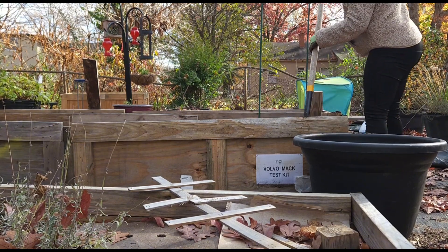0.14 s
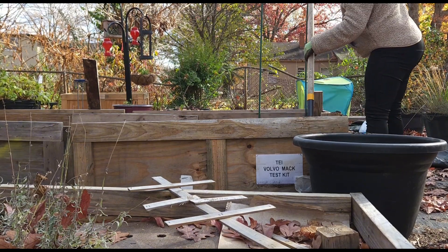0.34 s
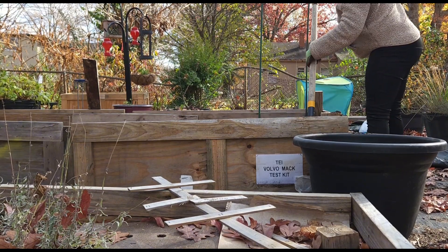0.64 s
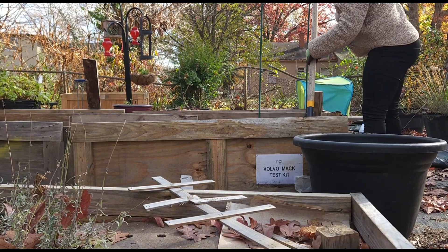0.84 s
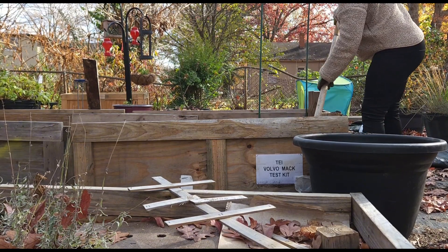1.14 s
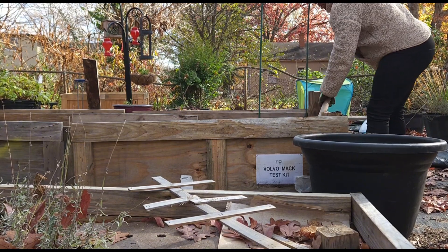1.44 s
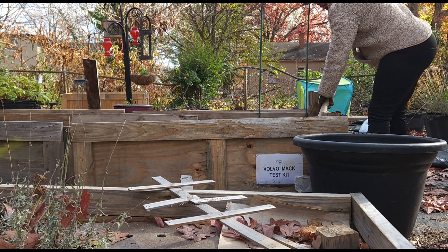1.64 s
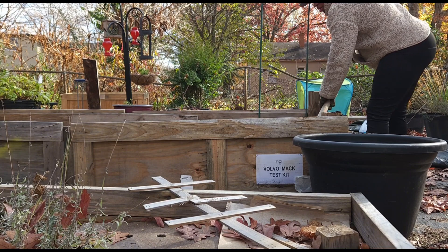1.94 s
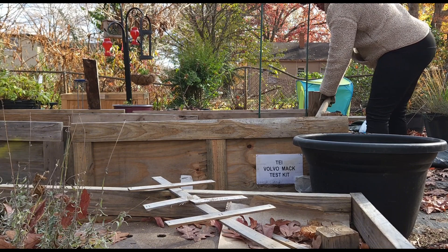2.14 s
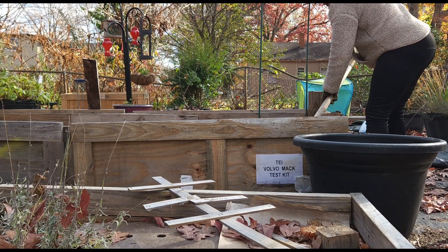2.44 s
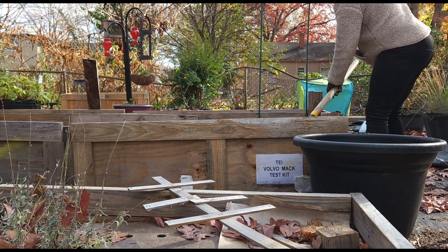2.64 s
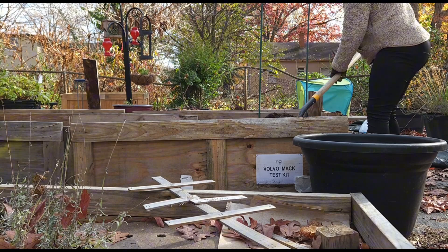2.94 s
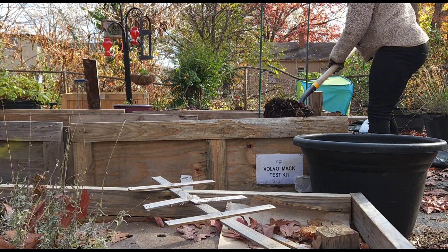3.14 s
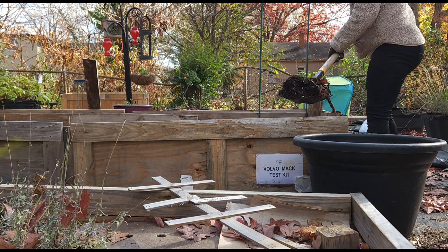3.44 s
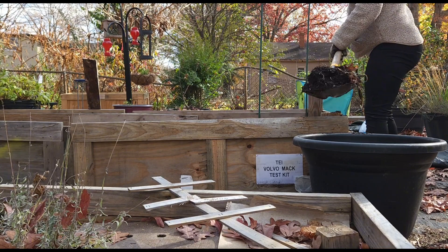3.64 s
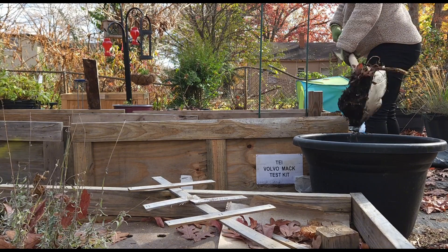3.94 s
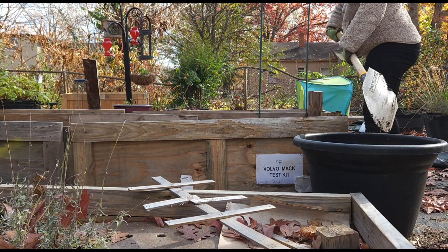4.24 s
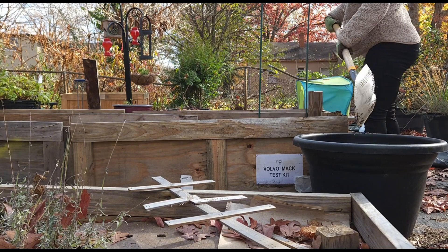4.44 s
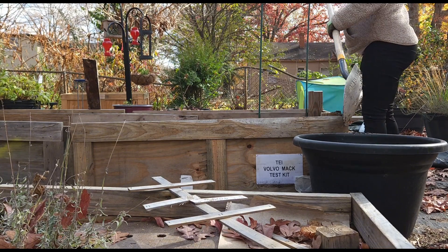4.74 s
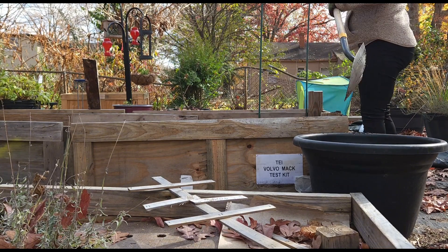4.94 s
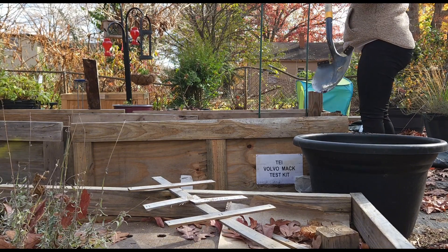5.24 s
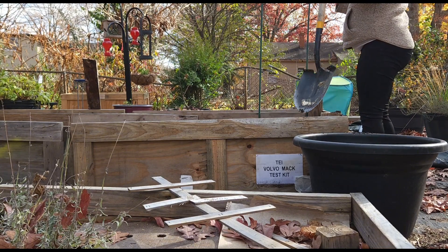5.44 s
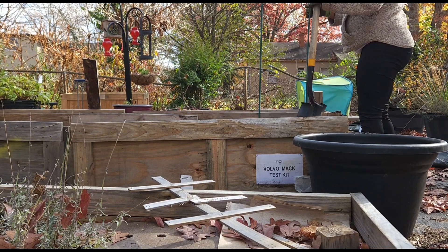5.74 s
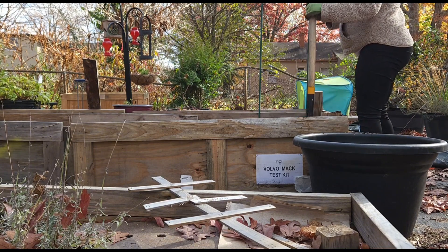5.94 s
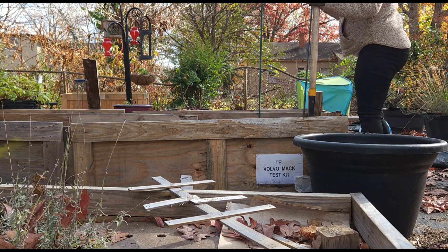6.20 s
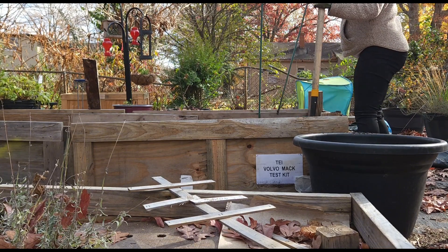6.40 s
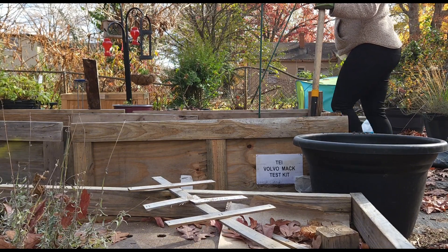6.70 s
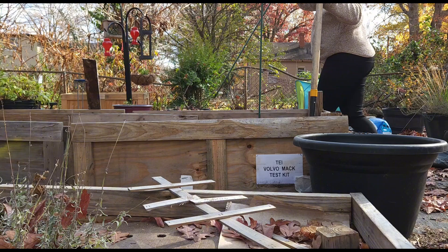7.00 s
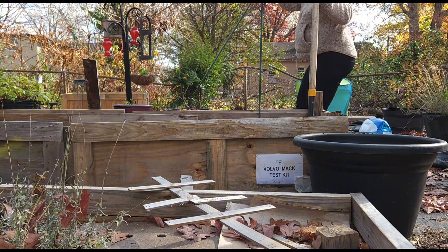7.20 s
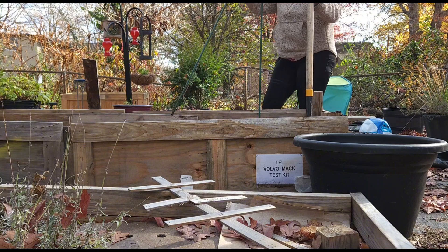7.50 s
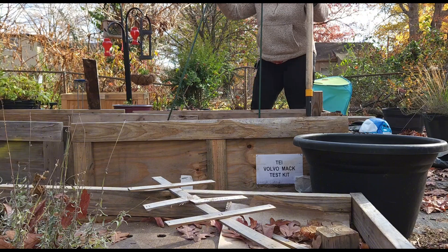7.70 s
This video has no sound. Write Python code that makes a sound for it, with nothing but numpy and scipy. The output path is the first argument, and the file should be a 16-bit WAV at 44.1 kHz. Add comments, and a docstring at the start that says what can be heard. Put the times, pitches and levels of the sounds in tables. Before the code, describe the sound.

A shovel knocks against a wooden garden bed, tips soil into a plastic pot and taps its rim, over a low outdoor rumble.

```python
"""A shovel knocks against the planks of a raised bed; clods break and grit rubs along the steel.
The hardest blow comes at 2 s. Just after 4 s soil slides off the blade into a big plastic pot,
and two taps on the rim set blade and pot ringing. After a few faint knocks and scrapes, feet
shuffle off through dry leaves and cracking twigs from 6.5 s.
Throughout: a distant engine's hum, low rumble and the hiss of the open yard."""
import sys
import numpy as np
from scipy import signal
from scipy.fft import rfft, irfft
from scipy.io import wavfile

SR = 44100
rng = np.random.default_rng(int(sys.argv[2]) if len(sys.argv) > 2 else 0)


def wav_record(signal):
    """Record a signal, one row per channel, as 16-bit PCM in the file named by sys.argv[1]."""
    frames = np.transpose(np.atleast_2d(signal))
    bounded = np.clip(frames, -1, 1)
    # unit amplitude maps onto the largest positive 16-bit level
    quanta = np.round(bounded * 32767).astype(np.int16)
    wavfile.write(sys.argv[1], SR, quanta)


N = 346626
TIME_S = np.arange(N) / SR
HIT_TIME_S = np.arange(SR // 2) / SR

# blows on the planks: start_s, gain_db, lowpass_hz, decay_rate_factor
KNOCKS = [(0.038, -46, 1800, 0.68), (.267, -28.5, 1080, 0.88), (0.3638, -32, 560, 1.1),
          (.417, -44, 1200, 1), (0.4418, -49.5, 900, 0.58), (.468, -48.5, 595, 0.53),
          (0.6319, -52, 1100, 0.53), (0.7582, -51.5, 1500, 0.51), (1.9852, -14.5, 660, 2.5),
          (2.279, -37.5, 400, 1.4), (5.896, -52, 1200, 0.81), (6.174, -55, 700, 1.1)]
# low thumps on the boards and the pot: start_s, level_db, end_pitch_hz, extra_start_pitch_hz, length_s
THUDS = [(0.329, -24.5, 55.7, 5, 0.056), (1.983, -7.5, 103, 336, 0.02), (2.2774, -19, 104.5, 10, 0.02),
         (4.227, -30, 89.5, 10, .03), (4.619, -23, 82, 69, .024), (7.822, -31, 135, 20, 0.016)]
# blade on the rim: start_s, ring_db, clash_db, pot_db, clash_highpass_hz, centre_hz, reach_oct
TAPS = [(4.6107, -37.5, -27, -25, 400, 2400, 8.6), (4.8182, -35.5, -33.5, -43, 1620, 2050, 0.12)]
# blade strokes through soil: start_s, length_s, level_db
CUTS = [(0.908, 0.063, -56.5), (1.215, 0.08, -63), (2.17, 0.225, -48.5), (5.838, 0.02, -58),
        (5.918, 0.081, -58.5)]
# clods breaking on the boards: start_s, level_db
CLOD_BREAKS = [(0.255, -47), (0.35, -48), (0.425, -47.5), (0.615, -49.5), (0.74, -59), (0.85, -56.5)]
# stones flicking the steel: start_s, gain_db, highpass_hz
STONE_TICKS = [(0.927, -41, 3000), (.957, -44, 1500), (1.985, -39.5, 1500), (4.1787, -27, 11000),
               (4.2334, -31, 11000), (4.8192, -47, 9000)]
# lumps dropping into the pot: start_s, level_db
LUMPS = [(4.209, -47), (4.231, -45.5), (4.282, -50), (4.322, -49), (4.375, -50)]
# steps in leaves: start_s, length_s, rustle_db, tread_db
STEPS = [(6.524, 0.26, -55.5, -63), (6.81, 0.17, -58, -63), (7.02, 0.27, -58, -66), (7.275, 0.24, -50, -51),
         (7.577, 0.12, -56, -70), (7.795, 0.018, -63, -52.5)]
# twigs cracking: start_s, ring_db, pitch_hz, snap_db
TWIG_CRACKS = [(5.896, -51, 1610, -64), (6.142, -53.5, 1460, -64), (7.296, -52, 990, -44),
               (7.352, -52, 950, -56), (7.395, -52, 1015, -44), (7.418, -64, 1100, -57),
               (7.452, -58, 1050, -51), (7.466, -55, 1090, -41), (7.492, -45.5, 970, -40),
               (7.515, -65, 1050, -38.5), (7.6576, -64, 1090, -61), (7.806, -44, 1005, -62)]

# modes: pitch_hz, gain_db, base_t60_s
PLANK_MODES = [(173, 2.5, 0.046), (240.6, 2.5, 0.12), (340.4, 3, 0.09), (425, -5, 0.049),
               (475, -2.5, 0.064), (653, -2, 0.079), (878, 0.5, 0.021), (987, -7.5, 0.061),
               (1185, -10.5, 0.05), (1690, -13, 0.031), (2010, -9.5, 0.063)]
BLADE_MODES = [(585, -11, 0.52), (808, -0.5, 0.54), (1168, -19, 0.37), (1376, -6, 0.25), (1443, -11, 0.34),
               (1577, -11, 0.45), (1706, -15, 0.45), (1838, -16, 0.45), (1927, -12, 0.26),
               (2016, -10, 0.52), (2060, -11, 0.35), (2432, -8, 0.4), (2511, -2, 0.34), (2772, -15, 0.28),
               (3865, -20, 0.52), (4624, -21, 0.52), (5644, -28, 0.52), (7086, -15, 0.28),
               (7355, -12, 0.24), (9000, -29, 0.3), (10420, -23, 0.45), (13140, -29, 0.26)]
CHOKED_MODES = [(1410, 2, 0.034), (1606, 2, 0.043), (1730, -7, 0.026), (2420, -2.5, 0.037), (7250, -6, .04)]  # blade pressed on the rim
POT_MODES = [(130.6, 3.5, 0.14), (162, 0, 0.099), (214, -2, 0.075), (249, -2.5, 0.081), (344, -2, 0.08),
             (413, -3.5, 0.078), (575, -5, 0.074)]
# twig modes: pitch_ratio, gain_db, t60_s
TWIG_MODES = [(1, 2.5, 0.063), (1.35, -7.5, 0.048), (2.15, -7, 0.047), (2.74, -4.5, .04), (4.25, -7, 0.037)]

# noise spectra: freq_hz, relative_density_db
CRUNCH_SPECTRUM = [(150, 8), (350, 8.5), (900, 2), (1500, 14), (2200, -13), (3200, 3), (8000, -5),
                   (16000, -30)]  # soil crushed by a knock
CLOD_SPECTRUM = [(230, 2.5), (350, 10), (480, 2), (750, -2), (1100, -24), (1600, -15.5), (2400, -38),
                 (4000, -40)]
CLASH_SPECTRUM = [(200, 6.5), (600, -7), (1000, -12), (1500, 1), (2600, -6), (3300, -16), (5500, -13),
                  (7300, -4), (8500, -15), (13000, -24), (16000, -26)]  # steel on the rim
SHIMMER_SPECTRUM = [(500, 4), (800, 3), (1200, -7), (1900, 0), (2600, -7), (3300, -10), (7300, -7),
                    (9000, -14), (10400, -22), (12000, -19), (16000, -26)]  # faint, crowded blade modes
GRIT_SPECTRUM = [(300, 5), (800, 3), (1800, -1.5), (3000, -0.5), (4800, 2.5), (5700, 1.5), (6400, 6),
                 (7400, -1), (9000, -3.5), (12000, -11), (16000, -13)]
STONE_SPECTRUM = [(1500, -5), (2100, 10), (3200, 1.5), (6000, -3), (7400, 8.5), (9000, -5), (12000, -13),
                  (14000, -10), (16000, -23)]
SLIDE_SPECTRUM = [(2000, -2), (6000, 3), (9000, -8), (11000, -5), (13000, 4), (16000, -11)]  # soil leaving the blade
LANDING_SPECTRUM = [(150, -7), (350, -10), (620, -2), (900, -5), (1300, -6), (1800, -13), (4000, -29)]  # soil landing in the pot
LEAF_SPECTRUM = [(1000, 1), (2200, 3), (3200, -1.5), (4600, 4.5), (6200, 1.5), (7400, 4), (9000, -9),
                 (12000, -10), (16000, -15)]
TREAD_SPECTRUM = [(200, 2), (400, 10), (750, -1.5), (1050, -1), (1700, -15), (3500, -29)]  # sole on the ground
RUMBLE_SPECTRUM = [(16, -25), (32, -5), (50, -1), (70, 0), (90, -1.5), (125, -3.5), (160, -9.5),
                   (205, -18.5), (250, -30), (320, -32), (420, -58), (900, -82)]
HISS_SPECTRUM = [(150, -28), (250, -6), (298, -7.5), (380, -1), (429, -8), (686, -7), (955, -14.5),
                 (2160, -13), (2810, -17.5), (4260, -16.5), (5830, -21), (7440, -19), (9010, -31.5),
                 (15200, -40), (16000, -37)]

# engine's firing line: time_s, level_db
FIRING_LEVEL = [(0, -45), (0.45, -37.5), (1.4, -56), (2.7, -48.5), (3.35, -40.5), (5.6, -38), (6.6, -46),
                (7.86, -53)]
# engine's lesser lines: pitch_hz, level_db
ENGINE_LINES = [(72, -48.5), (80, -51), (132, -55), (184, -61)]
# yard's stereo width: freq_hz, correlation
YARD_CORRELATION = [(60, 1), (130, 0.98), (290, 0.95), (640, 0.12), (1410, -0.28), (3100, 0.024),
                    (6820, -0.019), (15000, -0.0014)]
# yard's balance: freq_hz, left_minus_right_db
YARD_BALANCE = [(60, 1), (110, -1), (200, 2.5), (380, -0.5), (700, 1.5), (1290, 2.0), (2380, 3),
                (4400, 0.0), (8120, -0.5), (15000, 7.5)]


def plank_knocks(crunch_db=-7, crunch_t60_s=0.11, settle_db=-13, settle_t60_s=0.23):
    """Blows ring damp planks and loosen soil; each has its own dullness and damping."""
    out = np.zeros((2, N))
    for start_s, gain_db, lowpass_hz, damping in KNOCKS:
        ring = ringing([(hz, db, t60_s / damping) for hz, db, t60_s in PLANK_MODES])
        crunch = amp(crunch_db) * burst(CRUNCH_SPECTRUM, crunch_t60_s / damping, corr=0.64)
        settling = amp(settle_db) * burst(CLOD_SPECTRUM, settle_t60_s / damping, corr=0.94)
        lowpass = signal.butter(2, lowpass_hz, fs=SR)
        add(out, start_s, amp(gain_db) * signal.lfilter(*lowpass, ring + crunch + settling))
    return out


def thuds(glide_s=0.003):
    """A heavy push on the boards, or soil landing in the pot, gives a few low cycles; the higher pitches come
    first."""
    out = np.zeros((2, N))
    for start_s, level_db, end_hz, extra_hz, length_s in THUDS:
        t = np.arange(0, length_s, 1 / SR)
        window = abs(np.sin(np.pi * t / length_s)) ** 1.37
        add(out, start_s, amp(level_db) * window * tone(end_hz + extra_hz * np.exp(-t / glide_s)))
    return out


def rim_taps(bounce_s=0.0095, decay_rate_factor=0.91):
    """Steel clashes on the rim and bounces; the pot answers hollowly and the blade rings on."""
    out, t = np.zeros((2, N)), HIT_TIME_S
    for start_s, ring_db, clash_db, pot_db, highpass_hz, centre_hz, reach_oct in TAPS:
        for hz, db, t60_s in BLADE_MODES:
            excitation = np.exp(-0.5 * (np.log2(hz / centre_hz) / reach_oct) ** 2)  # set by the spot hit
            phase = 2 * np.pi * rng.random() + 1.1 * rng.standard_normal((2, 1))
            envelope = amp(ring_db + db - 60 * decay_rate_factor * t / t60_s) * attack(0.0013)
            add(out, start_s, excitation * envelope * np.sin(2 * np.pi * hz * t + phase))
        clash = burst(CLASH_SPECTRUM, t60_s=0.077, corr=0.68)
        clash += amp(-18) * burst(SHIMMER_SPECTRUM, t60_s=0.8, corr=0.8)
        clash += amp(-8) * ringing(CHOKED_MODES)
        add(clash, bounce_s, amp(-8) * burst(GRIT_SPECTRUM, t60_s=0.049, corr=0.39))
        highpass = signal.butter(2, highpass_hz, "high", fs=SR)
        add(out, start_s, amp(clash_db) * signal.lfilter(*highpass, clash))
        add(out, start_s, amp(pot_db) * ringing(POT_MODES) * attack(0.013))  # soft wall, slow to move
    return out


def digging(sing_db=-7):
    """Grit rubs along the blade, clods break against the boards, stones flick the steel."""
    push = sum(amp(db) * stroke(start_s, length_s, rise_share=0.62, t60_s=0.23)
               for start_s, length_s, db in CUTS)
    rub = grains(push, GRIT_SPECTRUM, per_s=8300, spread_db=2.5, clump_db=2, corr=0.44)
    # buried, only the blade's high modes sing, and briefly
    buried_modes = [(hz, 0, 0.025) for hz, _, _ in BLADE_MODES if 5000 < hz < 8000]
    steel = ringing(buried_modes)[None, :2000]
    singing = unit(signal.oaconvolve(rub, steel, axes=1)[:, :N])
    out = rub + amp(sing_db) * rub.std() * singing
    breaking = sum(amp(db) * stroke(start_s, length_s=0.036, rise_share=0.84, t60_s=0.37)
                   for start_s, db in CLOD_BREAKS)
    out += grains(breaking, CLOD_SPECTRUM, per_s=700, spread_db=3.5, clump_db=4, corr=0.83)
    for start_s, gain_db, highpass_hz in STONE_TICKS:
        highpass = signal.butter(4, highpass_hz, "high", fs=SR)
        tick = burst(STONE_SPECTRUM, t60_s=0.022, corr=0.3)
        add(out, start_s, amp(gain_db) * signal.lfilter(*highpass, tick))
    return out


def pouring(tip_s=4.166, length_s=0.12, fall_s=0.006, slide_db=-56, landing_db=-54.5):
    """Soil hisses off the blade and patters into the pot, a few lumps among the crumbs."""
    slide = amp(slide_db) * stroke(tip_s, length_s, rise_share=0.1, t60_s=0.3)
    landing = amp(landing_db) * stroke(tip_s + fall_s, length_s, rise_share=0.15, t60_s=0.61)
    out = grains(slide, SLIDE_SPECTRUM, per_s=3200, spread_db=3.5, clump_db=4, corr=0.24)
    out += grains(landing, LANDING_SPECTRUM, per_s=900, spread_db=0.5, clump_db=1.5, corr=0.68)
    for start_s, level_db in LUMPS:
        add(out, start_s, amp(level_db) * burst(LANDING_SPECTRUM, t60_s=0.075, corr=0.7))
    return out


def footsteps():
    """Dry leaves crumple as the weight rolls onto each shoe; twigs crack singly."""
    weight = np.array([stroke(start_s, length_s, rise_share=0.95, t60_s=0.42)
                       for start_s, length_s, _, _ in STEPS])
    _, _, rustle_db, tread_db = np.transpose(STEPS)
    out = grains(amp(rustle_db) @ weight, LEAF_SPECTRUM, per_s=3800, spread_db=0, clump_db=3, corr=0.12)
    out += grains(amp(tread_db) @ weight, TREAD_SPECTRUM, per_s=900, spread_db=3.5, clump_db=4, corr=0.98)
    for start_s, ring_db, pitch_hz, snap_db in TWIG_CRACKS:
        ring = amp(ring_db) * ringing(TWIG_MODES, pitch_hz)
        snap = amp(snap_db) * burst(LEAF_SPECTRUM, t60_s=0.02, corr=0.15)
        add(out, start_s, ring + snap)
    return out


def fence_echoes(sound, t60_s=0.18, per_s=1500, predelay_s=0.012):
    """Thin, scattered reflections from fences and walls."""
    t = HIT_TIME_S
    echoes = rng.standard_normal((2, len(t))) * (rng.random((2, len(t))) < per_s / SR)
    echoes *= (t > predelay_s) * amp(-60 * t / t60_s)
    echoes /= np.linalg.norm(echoes, axis=1, keepdims=True)
    return signal.fftconvolve(sound, echoes, axes=1)[:, :N]


def engine(firing_hz=101.8, sag_hz_per_s=0.8, waver_hz=1.29, fade_db=2):
    """A far engine: a slowly sagging firing line, with lesser lines that waver and fade in and out."""
    firing_db = np.interp(TIME_S, *np.transpose(FIRING_LEVEL))
    hum = amp(firing_db) * tone(firing_hz - sag_hz_per_s * TIME_S)
    for line_hz, line_db in ENGINE_LINES:
        hum += amp(line_db + fade_db * drift(3)) * tone(line_hz + waver_hz * drift(3))
    return np.sqrt(2) * hum


def yard(rumble_db=-41.5, flutter_db=1, hiss_db=-53.78, deep_hz=75, settle_s=3.8):
    """Rumble and hiss from all around, alike in both ears only in the bass."""
    hz = np.fft.rfftfreq(N, 1 / SR)
    bins = stereo(*rfft(rng.standard_normal((2, N))), curve(YARD_CORRELATION, hz))
    balance = amp(curve(YARD_BALANCE, hz) * np.array([[0.5], [-0.5]]))
    field = irfft(bins * balance, N)
    rumble = colour(field, RUMBLE_SPECTRUM) * amp(rumble_db + flutter_db * drift(11))
    deep = signal.filtfilt(*signal.butter(2, deep_hz, fs=SR), rumble)
    deep_gain = amp(-3 + 9.5 * np.exp(-TIME_S / settle_s))  # starts strong, then settles
    hiss = colour(field, HISS_SPECTRUM) * amp(hiss_db + 0.16 * drift(1.5))
    return rumble + deep * (deep_gain - 1) + hiss


def ringing(modes, pitch_scale=1):
    """Struck modes of alternating sign, each dying at its own rate."""
    t = HIT_TIME_S
    return sum((-1) ** k * amp(db - 60 * t / t60_s) * np.sin(2 * np.pi * pitch * pitch_scale * t)
               for k, (pitch, db, t60_s) in enumerate(modes))


def burst(spectrum, t60_s, corr):
    """A spray of tiny contacts, as decaying noise."""
    noise = stereo(*rng.standard_normal((2, len(HIT_TIME_S))), corr)
    return colour(noise, spectrum) * amp(-60 * HIT_TIME_S / t60_s) * attack(0.00015)


def grains(envelope, spectrum, per_s, spread_db, clump_db, corr):
    """Small ticks of uneven size, coming in clumps."""
    size = amp(spread_db * np.minimum(rng.exponential(1, (2, N)), 4))
    ticks = rng.choice([-1, 1], (2, N)) * size * (rng.random((2, N)) < per_s / SR)
    clumps = amp(clump_db * np.tanh(drift(90)))
    return envelope * unit(colour(stereo(*ticks, corr), spectrum) * clumps)


def stroke(start_s, length_s, rise_share, t60_s):
    """Gain of one movement: builds over a share of its length, holds, then dies away."""
    t = TIME_S - start_s
    rise = np.sin(np.pi / 2 * np.clip(t / (length_s * rise_share), 0, 1))
    return rise * amp(-60 * np.clip((t - length_s) / t60_s, 0, 2))


def attack(rise_s):
    """Exponential onset of a hit."""
    return 1 - np.exp(-HIT_TIME_S / rise_s)


def tone(pitch_hz):
    """Sine following a pitch track."""
    return np.sin(2 * np.pi * np.cumsum(pitch_hz) / SR)


def colour(x, spectrum):
    """Filters x by a spectrum, rolled off below its first point; rms one."""
    hz = np.fft.rfftfreq(x.shape[-1], 1 / SR)
    gain = amp(curve(spectrum, hz)) * np.minimum(hz / spectrum[0][0], 1) ** 2
    return unit(irfft(rfft(x) * gain, x.shape[-1]))


def drift(per_s):
    """Smooth random wander, rms one."""
    knots = rng.standard_normal(int(N / SR * per_s) + 4)
    return unit(signal.resample(knots, N))


def stereo(a, b, corr):
    """Two channels of correlation corr from two unrelated signals."""
    mid, side = np.sqrt((1 + corr) / 2) * a, np.sqrt((1 - corr) / 2) * b
    return np.array([mid + side, mid - side])


def curve(points, hz):
    """Interpolates a table over log frequency."""
    points_hz, values = np.transpose(points)
    return np.interp(np.log(hz + 1), np.log(points_hz + 1), values)


def add(mix, start_s, sound):
    """Mixes a sound in at start_s."""
    part = mix[:, round(start_s * SR):][:, :sound.shape[-1]]
    part += sound[..., :part.shape[1]]


def amp(db):
    """Decibels to gain."""
    return 10 ** (np.asarray(db) / 20)


def unit(x):
    """Scales to rms one."""
    return x / np.sqrt(np.mean(x ** 2) + 1e-20)


def scene(echo_db=-15.5, left_delay_samples=3):
    """The work, slightly to the right and so later in the left ear, over yard and engine."""
    work = plank_knocks() + rim_taps() + digging() + pouring() + footsteps()
    work[0] = np.roll(work[0], left_delay_samples)
    return work + amp(echo_db) * fence_echoes(work) + thuds() + yard() + engine()


def record(dry, cutoff_hz=15900):
    """Steep low-pass on the top treble."""
    lowpass = signal.firwin(511, cutoff_hz, window=("kaiser", 9), fs=SR)
    return signal.oaconvolve(dry, lowpass[None], "same")


dry = scene()
out = record(dry)
wav_record(out)
```